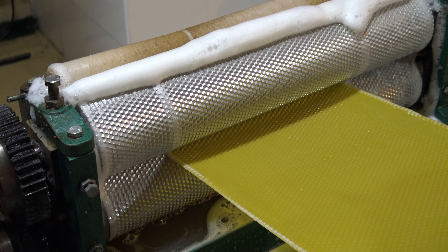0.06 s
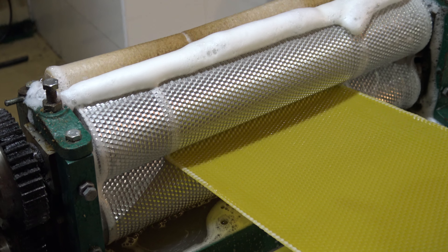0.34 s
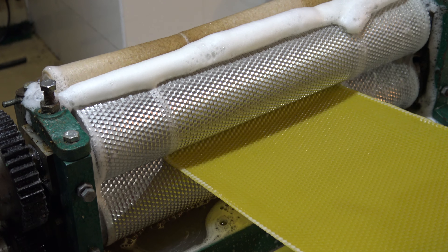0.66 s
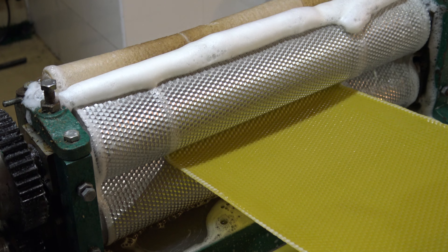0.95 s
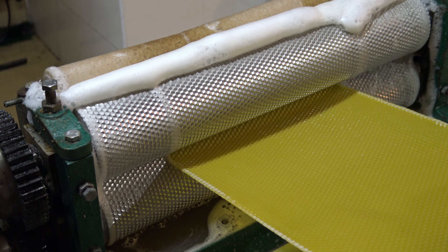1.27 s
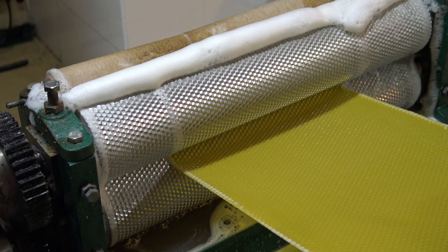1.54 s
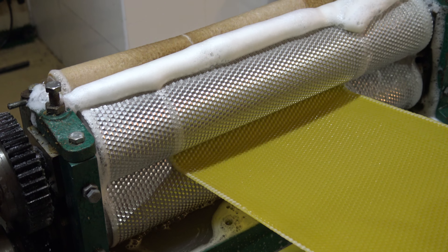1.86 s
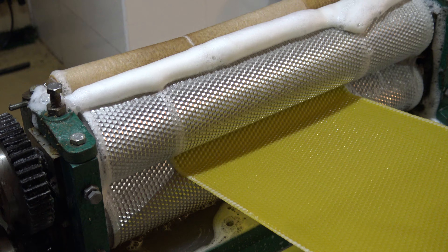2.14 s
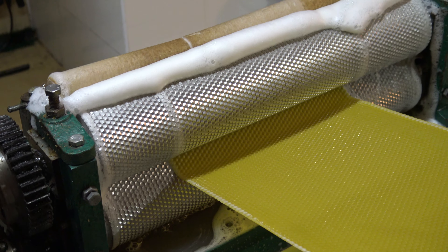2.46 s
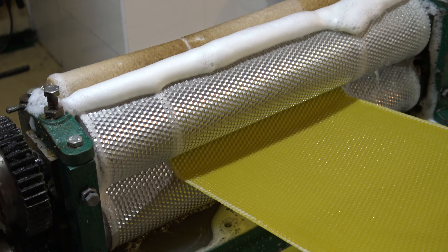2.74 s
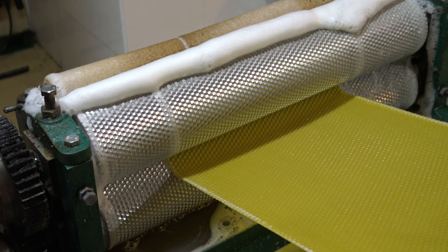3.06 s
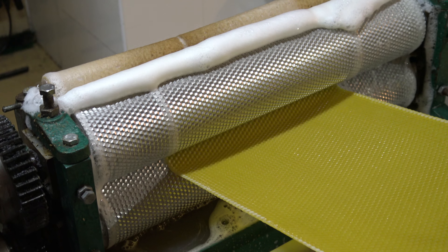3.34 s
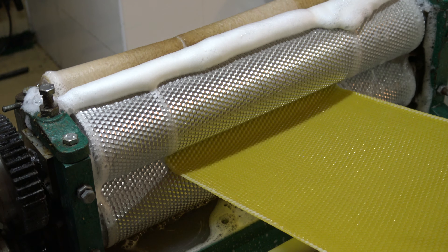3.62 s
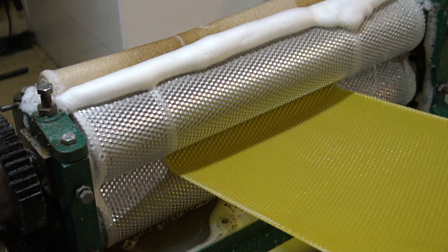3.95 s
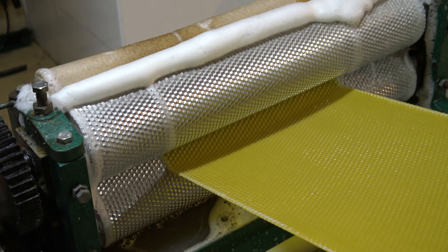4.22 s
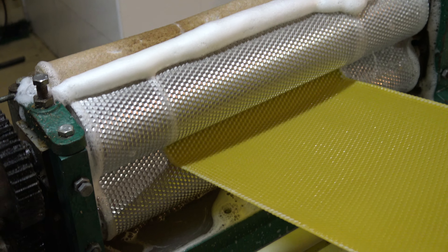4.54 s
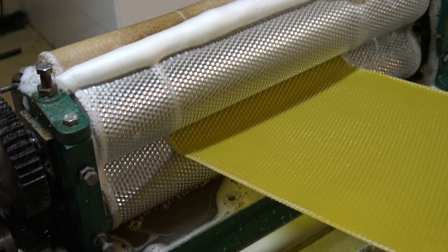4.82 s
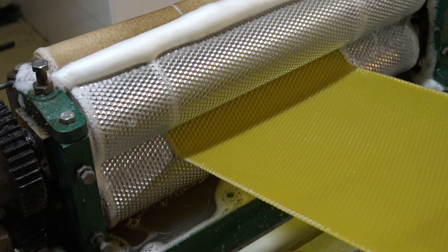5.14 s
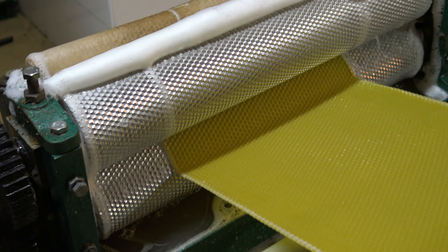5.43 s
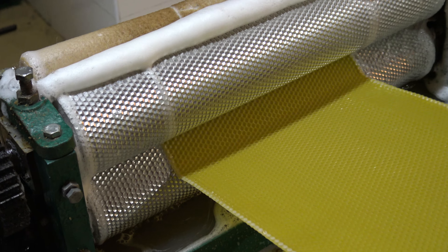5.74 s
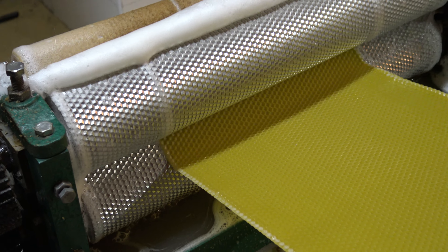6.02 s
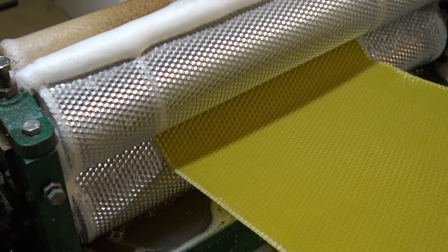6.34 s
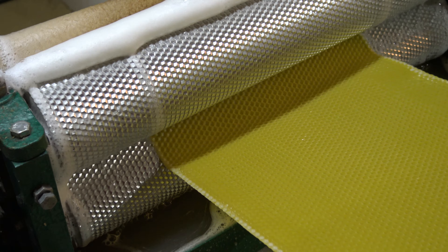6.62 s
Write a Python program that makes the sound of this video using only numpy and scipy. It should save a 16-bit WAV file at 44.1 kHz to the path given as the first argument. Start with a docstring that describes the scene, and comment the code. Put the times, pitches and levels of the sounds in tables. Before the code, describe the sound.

A motor-driven roller mill runs steadily in a workshop, heard close and slightly to the left. Its gears hum and rasp with a slight throb and a metallic ring, while a thin, high electric whine holds over an even rush of bearings. A belt thumps softly about five times a second and rough gear teeth knock lightly. In the second half, a few faint ticks and a fine crackle come from wax peeling off the roller.

```python
"""A motor-driven roller mill embosses a wax sheet in a workshop. Its pinion and gear wheel hum,
rasp and ring the iron frame, throbbing as their uneven teeth come round. The inverter makes the
motor windings whine near 8 kHz over a rush of bearings and air. The belt joint thumps once a lap,
two rough teeth knock, and wax crackles and ticks off the wet roller. The listener leans in,
passing through the whine's standing waves."""
import sys
import numpy as np
from scipy import signal
from scipy.fft import rfft, irfft, next_fast_len
from scipy.io import wavfile
from scipy.ndimage import map_coordinates

SR = 44100
rng = np.random.default_rng(int(sys.argv[2]) if len(sys.argv) > 2 else 0)


def wrap_up_sound(samples):
    """Save the sound to the file named by the first command line argument, as 16-bit audio."""
    columns = np.atleast_2d(samples).T
    # keep every value between -1 and 1, then stretch to whole-number steps
    tamed = np.clip(columns, -1, 1)
    steps = np.round(tamed * 32767).astype(np.int16)
    wavfile.write(sys.argv[1], SR, steps)


N = 295029
PINION_TEETH, WHEEL_TEETH, TEETH_PER_BELT_LAP = 17, 63, 38.65
CARRIER_HZ, DRIVE_HZ, ROTOR_HZ = 8000, 26.04, 24.99

# Mill speed, sagging under load. Each row: time in seconds, tooth mesh rate in Hz.
MESH_RATE_HZ = [(0, 212.43), (3.6, 212.45), (4, 212.24), (5.8, 212.26), (6.7, 212.38)]
# Listener's approach, in two moves. Each row: time in seconds, nearness 0-1.
NEARNESS = [(0, 0.097), (0.6, -0.0), (2.2, 0.059), (3.8, 0.148), (4.6, 0.526), (5.1, 0.549), (5.8, 0.92),
            (6.7, 1.0)]
# Gear runout for 1, 2, .. lobes a turn. Each row: depth, tightest point in a lobe 0-1.
PINION_RUNOUT = [(.95, 0.37)]
WHEEL_RUNOUT = [(0.75, .92), (0.67, 0.92), (0.27, 0.31), (0.38, 0.58)]
# Frame ring. Each row: time in seconds, relative level in dB.
RING_DB = [(0, -31), (2.0, -29.5), (3.2, -31), (4.2, -30), (5.05, -26), (5.9, -27.5), (6.1, -29.5),
           (6.7, -28)]
# Frame's smooth response. Each row: frequency in Hz, relative gain in dB.
FRAME_RESPONSE_DB = [(150, -9.5), (250, 2), (345, -11.5), (430, 2), (540, -3), (650, 3.5), (800, 2),
                     (1020, -4.5), (1190, -0.5), (1320, -6.5), (1630, -7), (1800, 0.5), (2230, -6),
                     (2380, -7), (2760, -10), (2840, -31), (9000, -68)]
# Its narrow resonances. Each row: centre in Hz, width in Hz, level in dB re the smooth response.
FRAME_RESONANCES = [(477.4, 15.4, 3.5), (727, 4.6, -9), (806, 20, 3), (1209, 39, 8.5), (1813, 5.5, 9.5),
                    (2265, 22, 9), (2507, 25, 6), (2500, 13, -1), (2720, 15, 8)]
# Weak mesh overtones. Each row: multiple of the mesh rate, far and near levels in dB.
MESH_OVERTONES = [(2, -56, -46), (5, -56.5, -54), (9, -61, -43.5), (13, -62, -55.5)]
# Inverter sidebands. Each row: carrier offset in multiples of DRIVE_HZ, far and near relative levels
# in dB, echo gain 0-1, standing-wave crest spacing and one crest's position, both in nearness.
INVERTER_SIDEBANDS = [(-5, -36.5, -40.2, 0.44, 0.729, 0.593), (-3, -42.5, -45.0, 0.73, 0.534, 0.375),
                      (-1, -26.0, -36.3, 0.32, 0.636, 0.261), (1, -39.4, -33.6, 0.26, 0.321, 0.27),
                      (3, -42.3, -46.1, 0.78, 0.774, 0.265), (5, -34.4, -41.2, 0.73, 0.683, 0.395)]
# Faint upper inverter tones. Each row: frequency in Hz, relative level in dB.
INVERTER_HIGH_TONES = [(11921.7, -65.5), (11999.8, -62.5), (12077.4, -70), (15572.9, -69), (15624.8, -67),
                       (15647.9, -65), (15676.8, -61)]
# Listener's drift across the standing waves. Each row: time in seconds, left minus right in dB.
WHINE_SWAY_DB = [(0, 1.5), (1.5, 0), (3, -.5), (3.9, -1.5), (4.8, 0), (5.6, 0), (6.4, 2.5)]
# Rush of bearings and air. Each row: frequency in Hz, relative level in dB.
RUSH_SPECTRUM_DB = [(22, -10), (35, 0), (58, 10), (82, 9), (300, 15), (1500, 10), (2900, 7.5), (3550, 6.5),
                    (4100, 4), (4700, 4.5), (5300, 0.5), (7000, 2), (9500, -8.5), (12500, -5), (15000, -18)]
# Ringing bearing races. Each row: centre in Hz, width in Hz, relative level in dB.
RACE_MODES = [(3400, 37, 10), (3643, 33, 10), (4560, 12, 14), (4895, 22, 12.5), (6700, 52, 0)]
# Belt joint's slap and rebounds. Each row: delay in seconds, relative level in dB, pitch in Hz,
# half-length in seconds.
BELT_SLAPS = [(0, 0.5, 140, 0.013), (.034, -5.5, 150.6, 0.0099), (.066, -8.5, 134, 0.015),
              (.12, -19.5, 127, 0.023)]
# Belt guard resonances. Each row: centre in Hz, width in Hz, relative level in dB.
GUARD_MODES = [(57, 7.5, -14), (284, 19, -2)]
# Rough wheel teeth. Each row: position in the turn 0-1, mean peak in dB.
KNOCKING_TEETH = [(.595, -32.5), (.84, -30)]
# Gear wheel modes. Each row: frequency in Hz, relative level in dB, T60 in seconds.
WHEEL_RESONANCES = [(660, -15, 0.018), (738, -14, .04), (796.6, 10.5, 0.058), (796, -9, 0.037)]
# Wax ticks. Each row: start in seconds, relative level in dB, centre in Hz, decay time in seconds.
WAX_TICKS = [(3.21, -45, 11800, 0.008), (4.92, -47, 12940, 0.025), (5.068, -38, 8200, 0.017),
             (5.186, -29, 5800, 0.014), (5.567, -39, 12000, 0.0066), (6.304, -41, 12500, .004),
             (6.346, -44, 12370, 0.0053), (6.532, -35, 12950, 0.0047), (6.64, -31, 5860, 0.0076),
             (6.66, -32, 12000, 0.0034)]
# Mill's stereo balance. Each row: frequency in Hz, left minus right in dB.
BALANCE_DB = [(60, 1), (140, 2), (205, 4.5), (290, 0), (700, 2.8), (1400, 3.6), (2400, 3.5), (4400, 2.3),
              (8000, 2.1), (15000, 1.5)]


def amp(db):
    return 10 ** (np.asarray(db) / 20)


def unit_rms(x):
    return x / np.sqrt(np.mean(x ** 2) + 1e-20)


def log_interp(points, hz):
    """(Hz, value) points read on a log frequency axis."""
    knots_hz, values = np.transpose(points)
    return np.interp(np.log(hz + 1), np.log(knots_hz + 1), values)


def timeline(points):
    """(seconds, value) points read at every sample."""
    return np.interp(np.arange(N) / SR, *np.transpose(points))


def wobble(rate_hz):
    """Smooth random curve with knots at rate_hz."""
    knots = rng.standard_normal(int(N * rate_hz / SR) + 4)
    return map_coordinates(knots, [np.arange(N) * rate_hz / SR])


def filtered(x, response):
    """Apply a complex response, given as a function of Hz."""
    size = next_fast_len(N + SR // 2)
    return irfft(rfft(x, size) * response(np.fft.rfftfreq(size, 1 / SR)), size)[..., :N]


def resonances(modes, hz):
    """Causal response of (centre Hz, width Hz, dB) modes of alternating sign."""
    return sum((-1) ** k * amp(db) * 1j * hz * width / (centre ** 2 - hz ** 2 + 1j * hz * width)
               for k, (centre, width, db) in enumerate(modes))


def cycle(turns, peak):
    """Cosine peaking at the given fraction of each turn."""
    return np.cos(2 * np.pi * (turns - peak))


def tone(hz, drift_rad, scatter_cycles=1, shift_rad=0):
    """Unit-rms sine with a scattered start phase and slow phase drift."""
    cycles = hz * np.arange(N) / SR + scatter_cycles * rng.random()
    return np.sqrt(2) * np.sin(2 * np.pi * cycles + drift_rad * wobble(1.943) + shift_rad)


def tightness(turns, runout):
    """How deep an out-of-round gear presses into the mesh."""
    return sum(depth * cycle(k * turns, peak) for k, (depth, peak) in enumerate(runout, 1))


def mesh_hum(teeth, tight):
    """Meshing teeth hum, less when tight; the off-centre pinion swings their timing."""
    lead_cycles = -0.05 * cycle(teeth / PINION_TEETH, 0.26) + 0.02 * wobble(23)
    level_db = -36 - 4 * tight + 0.81 * wobble(3.15)
    return amp(level_db) * cycle(teeth + lead_cycles, rng.random())


def scraping(teeth, repeat_share):
    """Tooth flanks slide; part of their roughness returns with each turn of each gear."""
    samples_per_tooth = round(SR / MESH_RATE_HZ[0][1])
    place = (teeth * samples_per_tooth).astype(int)
    wear = sum(rng.standard_normal(n * samples_per_tooth)[place % (n * samples_per_tooth)]
               for n in (PINION_TEETH, WHEEL_TEETH))
    return np.sqrt(repeat_share / 2) * wear + np.sqrt(1 - repeat_share) * rng.standard_normal(N)


def frame_ring(teeth, tight):
    """Tooth pressure drives a frame mode near the seventh mesh harmonic."""
    pressure = amp(3 * tight)
    lag_cycles = (0.056 * cycle(teeth / PINION_TEETH, 0.58)
                  + 0.065 * cycle(teeth / TEETH_PER_BELT_LAP, 0) + 0.05 * wobble(14))
    flutter = amp(1.1 * wobble(22))
    harmonic = unit_rms(pressure * flutter * cycle(7 * teeth, rng.random() + lag_cycles))
    friction = np.sqrt(pressure) * scraping(teeth, repeat_share=0.13)
    shaken = unit_rms(filtered(friction, lambda hz: resonances([(1467.5, 66.0, 0)], hz) ** 2))
    return amp(timeline(RING_DB)) * unit_rms(harmonic + amp(-2) * shaken)


def tooth_rasp(teeth, tight):
    """Each tooth scrapes going in and coming out; the frame colours the noise."""
    def frame_gain(hz):
        peak_power = sum(abs(resonances([mode], hz)) ** 2 for mode in FRAME_RESONANCES)
        return amp(log_interp(FRAME_RESPONSE_DB, hz)) * np.sqrt(1 + peak_power)

    strokes = amp(0.4 * tight + 0.3 * cycle(teeth, 0) + 2.2 * cycle(2 * teeth, 0))
    friction = scraping(teeth, repeat_share=0.36) * strokes
    return amp(-32) * unit_rms(filtered(friction, frame_gain))


def mesh_overtones(teeth, near):
    """Higher orders of the tooth rate grow as the listener nears."""
    out = 0
    for k, far_db, near_db in MESH_OVERTONES:
        level_db = far_db + (near_db - far_db) * near + 0.98 * wobble(4.7)
        out += amp(level_db) * unit_rms(cycle(k * teeth, rng.random() + 0.044 * wobble(14)))
    return out


def standing_wave(ears, echo_gain, spacing, crest):
    """Complex gain of a tone plus its echo, adding or cancelling with position."""
    approach_wavelengths = 1.74
    interference = 1 + echo_gain * np.exp(-2j * np.pi * (ears - crest) / spacing)
    return interference * np.exp(2j * np.pi * approach_wavelengths * ears.mean(axis=0))


def inverter_whine(near):
    """The windings sing at the switching sidebands, which beat into a fine buzz. Stereo."""
    ears = near + 0.077 * np.array([[0.5], [-0.5]])
    whine = 0
    for k, far_db, near_db, *echo in INVERTER_SIDEBANDS:
        wave = standing_wave(ears, *echo)
        sideband = tone(CARRIER_HZ + k * DRIVE_HZ, 0.3, scatter_cycles=0.45, shift_rad=np.angle(wave))
        level_db = far_db - 0.1 + (near_db - far_db + 2) * near
        # Switching mainly bends phase, so upper and lower sidebands oppose.
        whine += np.sign(k) * amp(level_db) * abs(wave) * sideband
    skirt = sum(amp(-40 - 1.4 * abs(k)) * tone(CARRIER_HZ + k * DRIVE_HZ, drift_rad=0.3)
                for k in range(-19, 20, 2) if abs(k) > INVERTER_SIDEBANDS[-1][0])
    pole_ripple = 0.035 * tone(6 * ROTOR_HZ, drift_rad=0.1)
    rotor_ripple = 0.021 * tone(ROTOR_HZ, drift_rad=0.18)
    flutter = 1 + pole_ripple + rotor_ripple + 0.066 * wobble(250) + 0.028 * wobble(1400)
    high_tones = sum(amp(db) * tone(hz, drift_rad=0.13) for hz, db in INVERTER_HIGH_TONES)
    sway_db = 0.85 * wobble(5.0) + np.outer([0.5, -0.5], timeline(WHINE_SWAY_DB))
    return (whine + skirt + high_tones) * flutter * amp(sway_db)


def bearing_rush(near):
    """Bearings and room air rush evenly; the races ring."""
    def colour(hz):
        return np.hypot(amp(log_interp(RUSH_SPECTRUM_DB, hz)), abs(resonances(RACE_MODES, hz)))

    return amp(-43.52 + 1.1 * near) * unit_rms(filtered(rng.standard_normal(N), colour))


def wax_crackle(near):
    """The sheet leaves the wet roller with a fine crackle, clearer from near."""
    grains_per_s, scatter_db = 110, 6
    onsets = rng.random(N) < grains_per_s / SR
    grains = onsets * rng.standard_normal(N) * amp(scatter_db * wobble(25))
    crackle = filtered(grains, lambda hz: amp(log_interp([(2000, -30), (5000, 5), (15000, 0)], hz)))
    return amp(-66.5 + 7 * near) * unit_rms(crackle)


def belt_thumps(teeth, near):
    """Once a lap the joint slaps over the pulley, rebounds and shakes the guard."""
    laps = teeth / TEETH_PER_BELT_LAP - 0.537
    thumps, t = np.zeros(N + SR), np.arange(-SR // 20, SR // 5) / SR
    for start in np.flatnonzero(np.diff(np.floor(laps))):
        for delay_s, db, hz, half_length_s in BELT_SLAPS:
            swing = cycle(hz * (1 + rng.normal(0, 0.022)) * (t - delay_s), rng.normal(0, 0.067))
            envelope = np.exp(-((t - delay_s) / half_length_s) ** 2)
            thumps[start:][:len(t)] += amp(db + rng.normal(0, 1)) * envelope * swing
    shaking = amp(5.5 * np.exp(-((laps + 0.2) % 1 - 0.26) ** 2 / 0.025))
    top_hz = 2 * GUARD_MODES[-1][0]
    guard = filtered(rng.standard_normal(N), lambda hz: resonances(GUARD_MODES, hz) * (hz < top_hz))
    belt = amp(-30.5) * thumps[SR // 20:][:N] + amp(-44) * unit_rms(shaking * guard)
    return amp(0.42 * near - 0.66) * belt


def tooth_knocks(teeth):
    """Once a turn each rough tooth takes up the backlash and rings the wheel."""
    out, t = np.zeros(N + SR), np.arange(SR // 8) / SR
    attack = 1 - np.exp(-t / 0.005)
    for turn, peak_db in KNOCKING_TEETH:
        for start in np.flatnonzero(np.diff(np.floor(teeth / WHEEL_TEETH - turn))):
            ring = attack * sum(amp(db + rng.normal(0, 2) - 60 * t / t60_s) * np.sin(2 * np.pi * hz * t)
                                for hz, db, t60_s in WHEEL_RESONANCES)
            out[start:][:len(t)] += amp(peak_db + rng.normal(0, 2.3)) * ring / abs(ring).max()
    return out[:N]


def wax_ticks():
    """Wax peels off the roller in short, bright ticks."""
    out, t = np.zeros(N + SR), np.arange(SR // 8) / SR
    for start_s, db, hz, decay_s in WAX_TICKS:
        band = signal.butter(2, [hz * 0.65, min(hz * 1.43, SR * 0.45)], "band", fs=SR, output="sos")
        burst = unit_rms(signal.sosfilt(band, rng.standard_normal(len(t))))
        envelope = np.exp(-t / decay_s) * (1 - np.exp(-t / 0.0015))
        out[round(start_s * SR):][:len(t)] += amp(db - 6) * burst * envelope
    return out[:N]


def wall_reflections(mill, t60_s):
    """The walls return a short diffuse tail, opposite in sign left and right."""
    t = np.arange(SR // 3) / SR
    tail = rng.standard_normal(len(t)) * amp(-60 * t / t60_s)
    reflected = signal.fftconvolve(mill.mean(axis=0), tail / np.linalg.norm(tail))[:N]
    return np.outer([1, -1], reflected)


def scene():
    """The mill, slightly left, between the workshop walls."""
    teeth = np.cumsum(timeline(MESH_RATE_HZ)) / SR  # count of teeth meshed
    near = timeline(NEARNESS)
    tight = tightness(teeth / PINION_TEETH, PINION_RUNOUT) + tightness(teeth / WHEEL_TEETH, WHEEL_RUNOUT)
    gears = mesh_hum(teeth, tight) + frame_ring(teeth, tight) + tooth_rasp(teeth, tight)
    drive = gears + mesh_overtones(teeth, near) + tooth_knocks(teeth) + belt_thumps(teeth, near)
    mill = drive + inverter_whine(near) + wax_ticks() + wax_crackle(near) + bearing_rush(near)
    direct = filtered(mill, lambda hz: amp(np.outer([0.5, -0.5], log_interp(BALANCE_DB, hz))))
    return direct + amp(-22) * wall_reflections(mill, t60_s=0.078)


def record(dry):
    """Cut the deepest bass and the top treble."""
    low_hz, top_hz = 31, 15830
    low_cut = signal.butter(6, low_hz, "high", fs=SR, output="sos")
    return filtered(signal.sosfilt(low_cut, dry), lambda hz: hz < top_hz)


dry = scene()
out = record(dry)
wrap_up_sound(out)
```